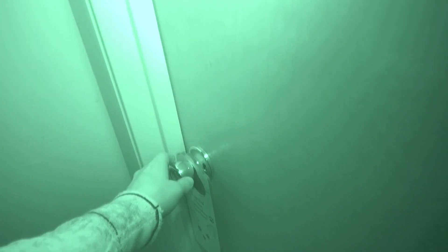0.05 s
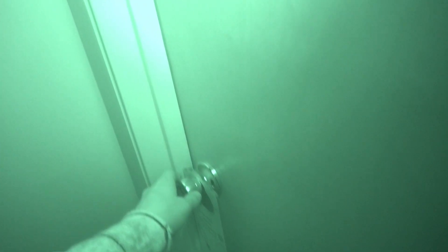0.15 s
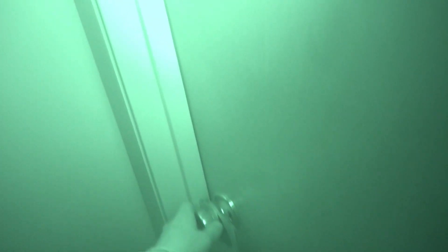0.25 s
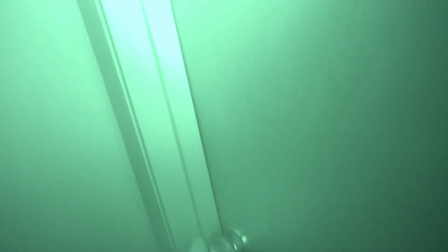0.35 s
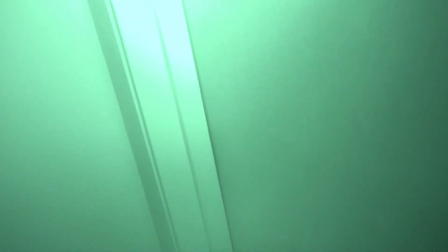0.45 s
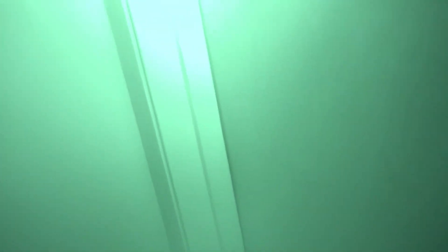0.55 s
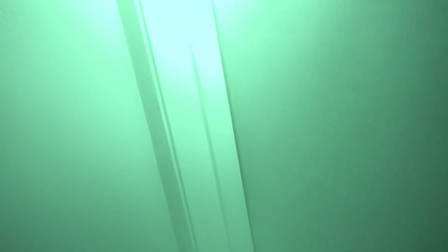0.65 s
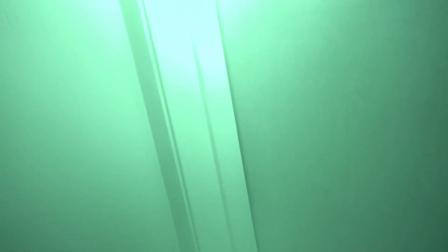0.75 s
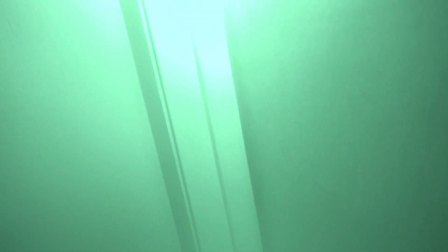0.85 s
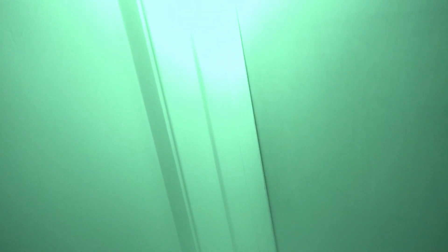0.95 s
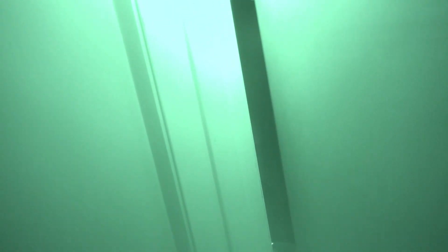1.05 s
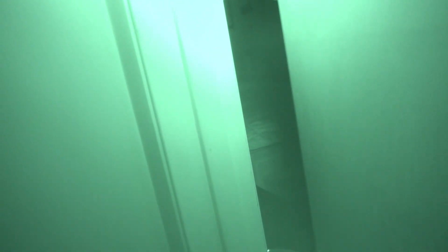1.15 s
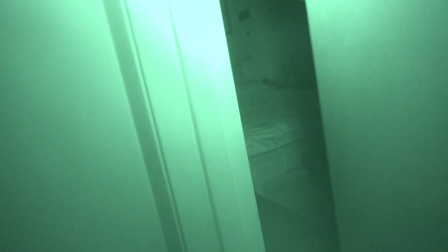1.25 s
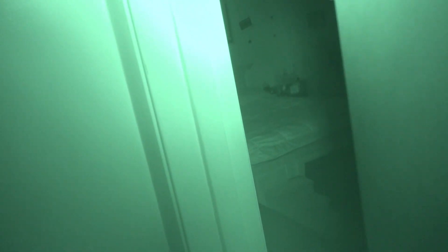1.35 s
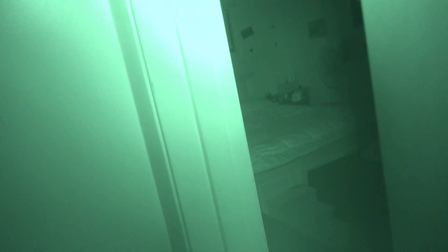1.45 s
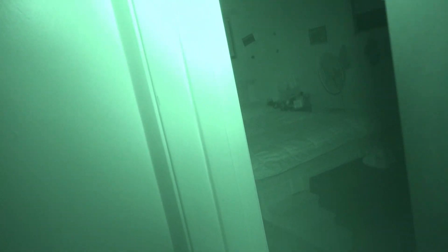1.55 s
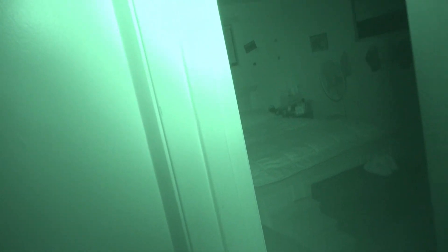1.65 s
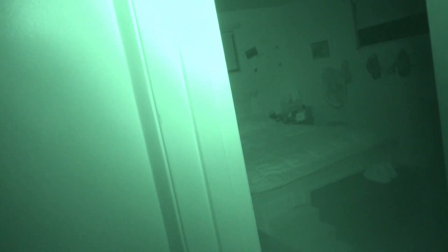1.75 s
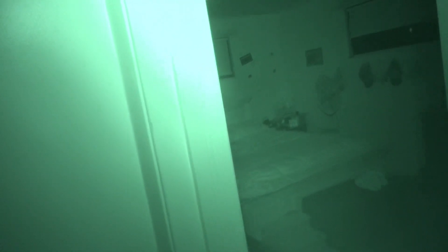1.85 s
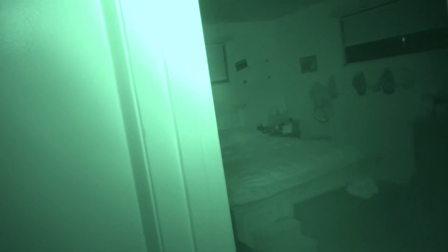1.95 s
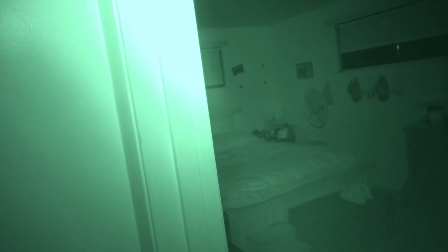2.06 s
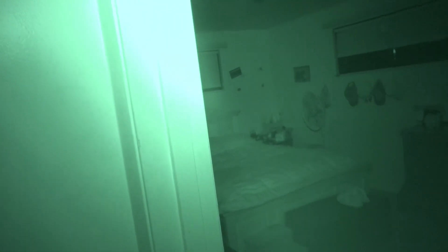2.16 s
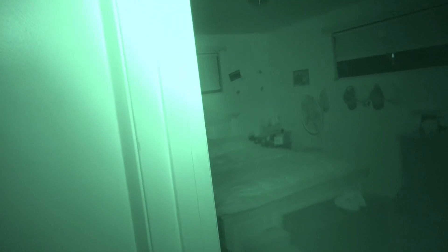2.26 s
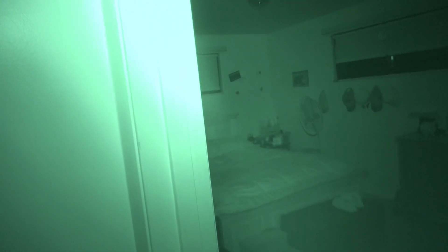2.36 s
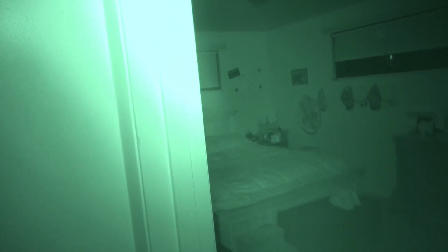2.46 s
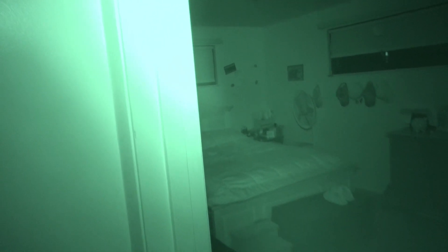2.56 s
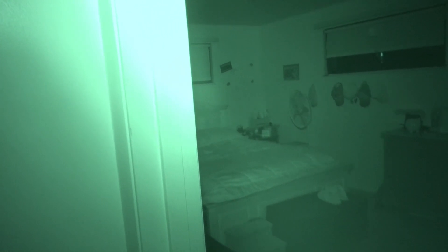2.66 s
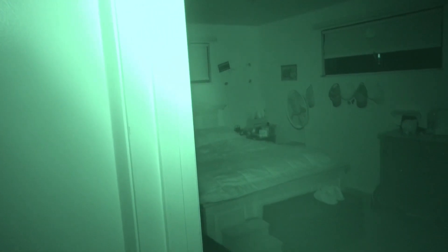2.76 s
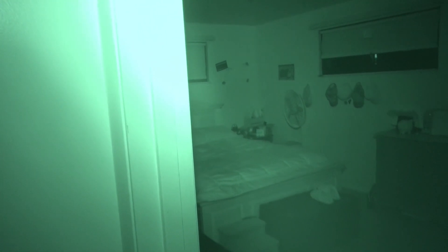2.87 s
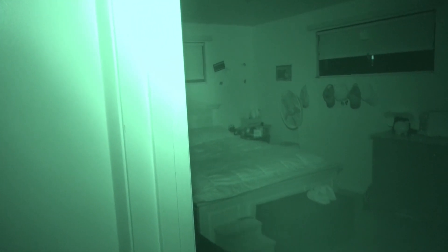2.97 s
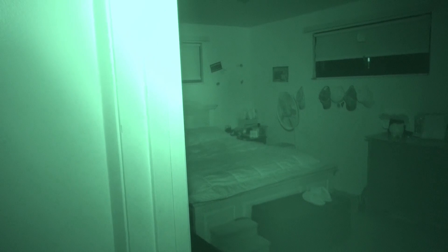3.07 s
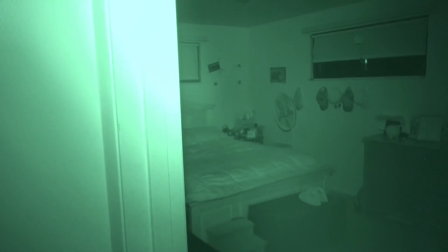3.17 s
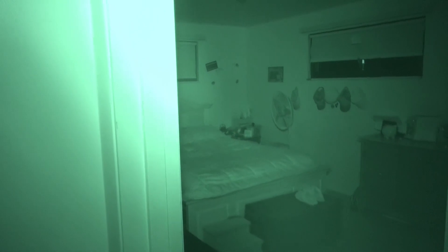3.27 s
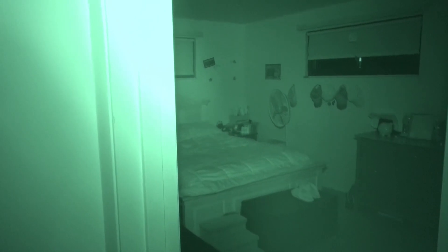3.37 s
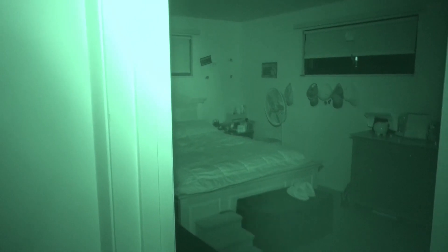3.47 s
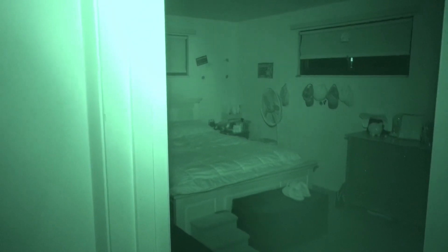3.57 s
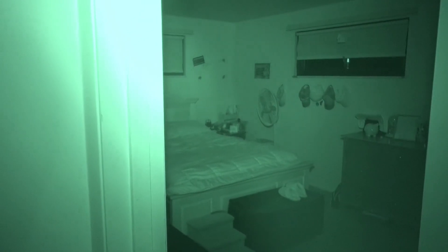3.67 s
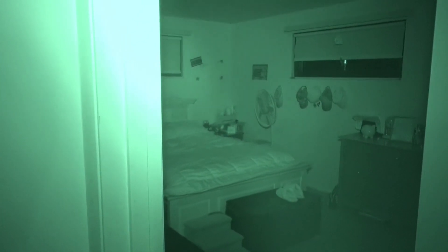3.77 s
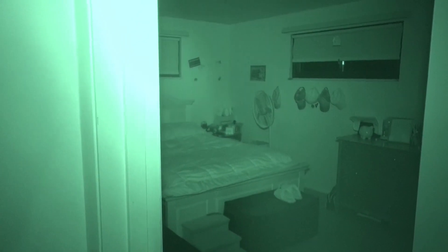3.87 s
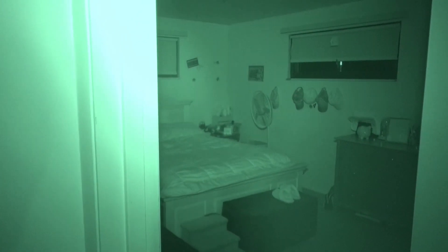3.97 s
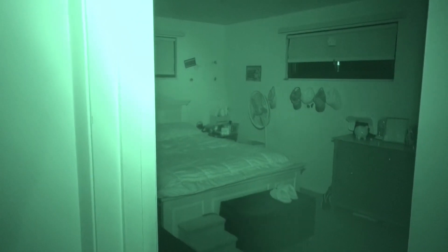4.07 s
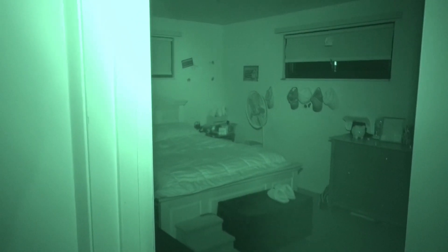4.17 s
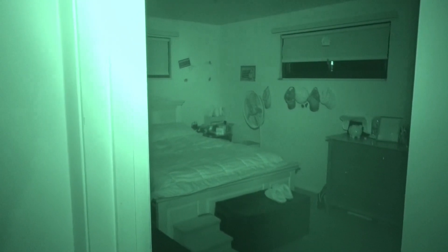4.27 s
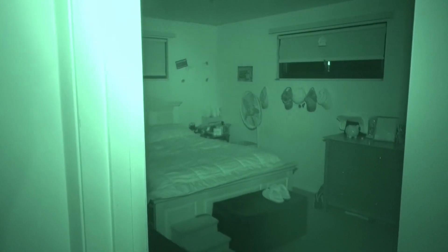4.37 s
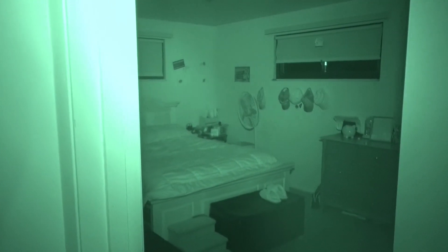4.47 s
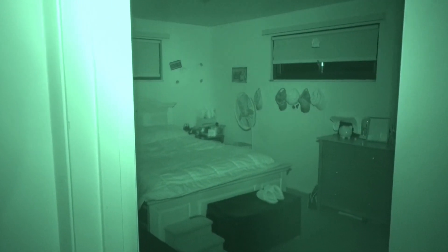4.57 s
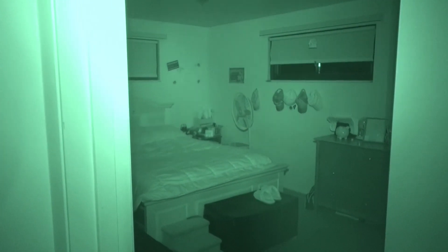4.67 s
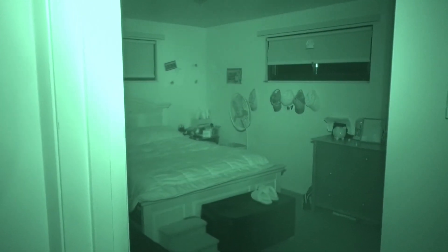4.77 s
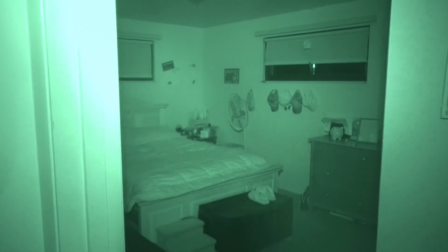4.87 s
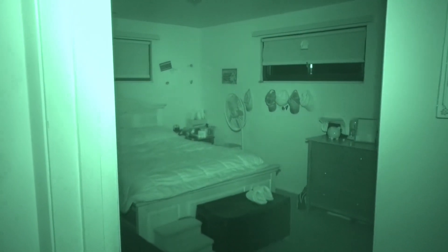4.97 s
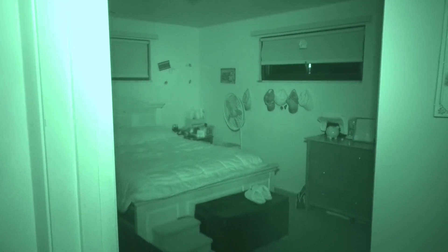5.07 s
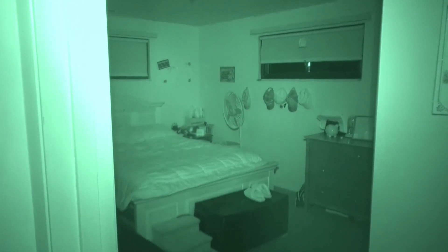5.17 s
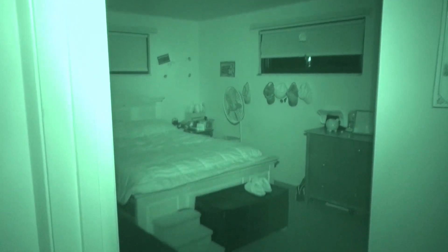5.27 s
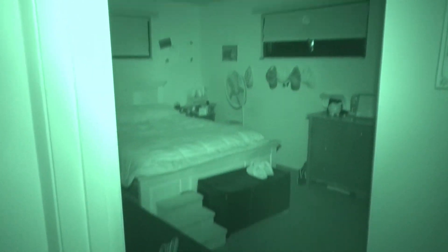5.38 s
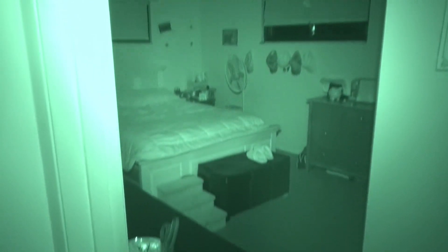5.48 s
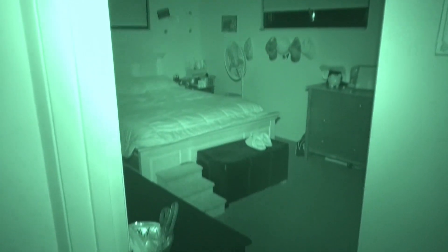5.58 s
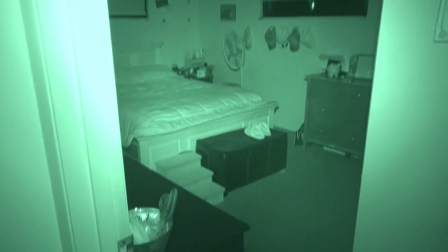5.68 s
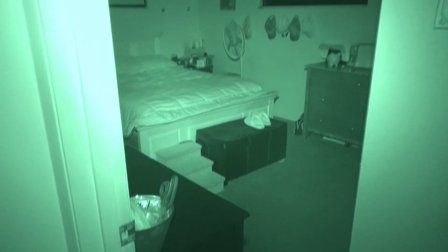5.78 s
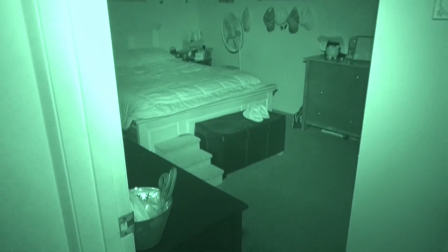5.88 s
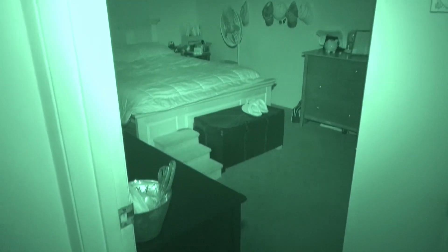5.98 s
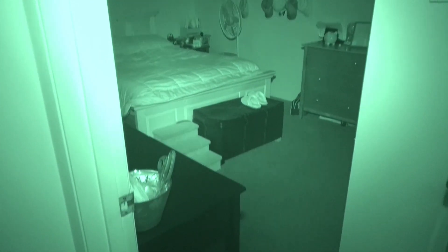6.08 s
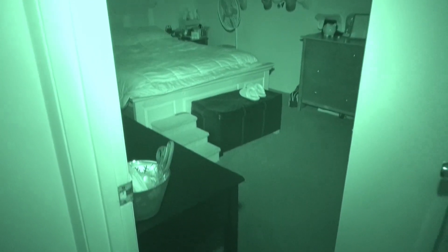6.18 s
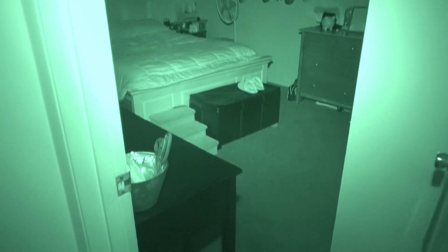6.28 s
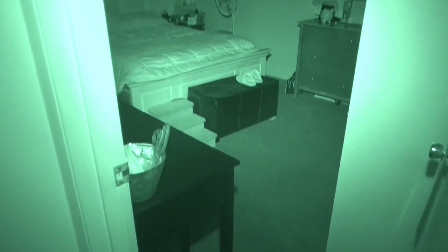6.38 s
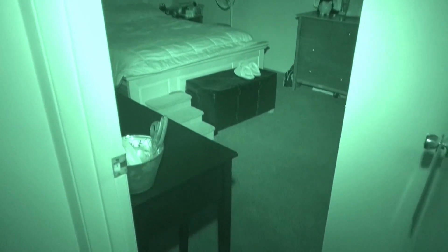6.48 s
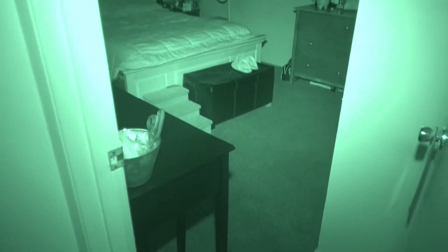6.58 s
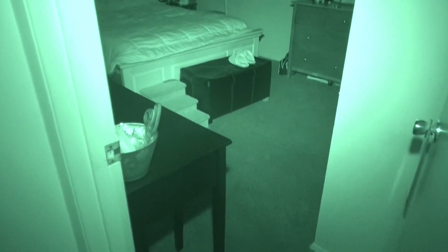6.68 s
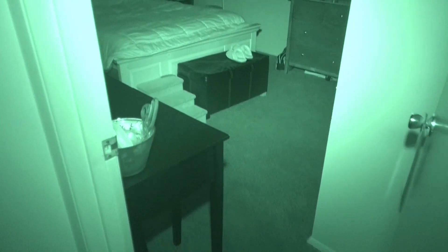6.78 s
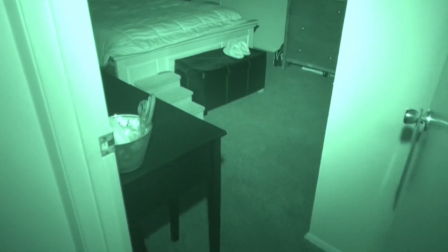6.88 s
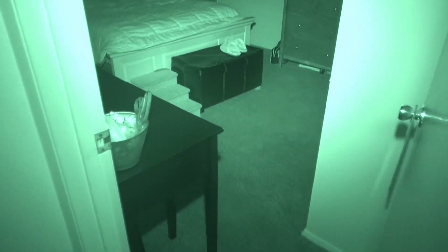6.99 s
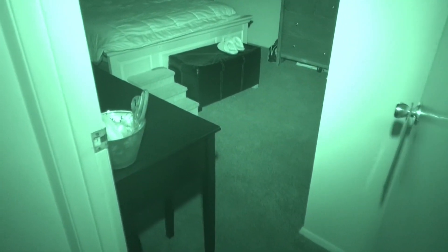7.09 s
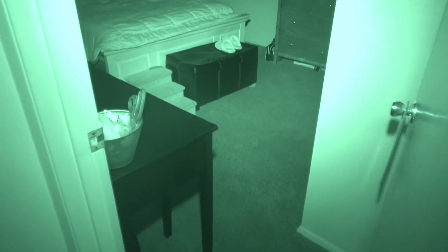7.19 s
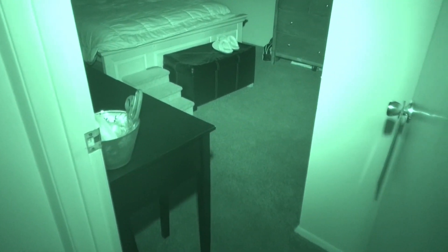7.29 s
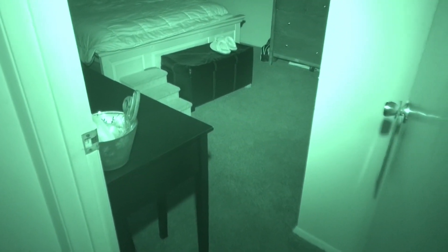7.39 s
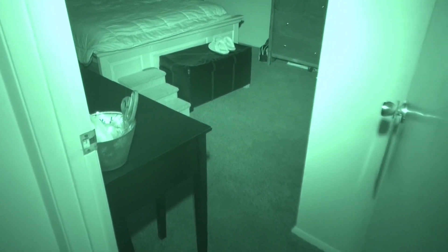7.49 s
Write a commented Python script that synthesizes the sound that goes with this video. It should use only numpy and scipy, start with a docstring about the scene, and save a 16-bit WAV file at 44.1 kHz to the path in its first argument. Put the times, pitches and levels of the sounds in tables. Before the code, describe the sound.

Quiet indoor room tone throughout: soft, slightly drifting hiss with a very faint fan hum near 350 Hz. From about 0.5 s a hand rubs the knob and a short spindle scrape sounds; at 0.7-0.95 s the hollow door bumps in its frame with dull wooden thumps and metal clacks. A scrape and faint groan come around 1.0 s, then loud bright latch clacks at 1.19 and 1.25 s, a rapid accelerating knob rattle with springy scrape near 1.3 s, and a sharp bolt snap with ringing at 1.5 s. A faint sleeve rustle follows near 1.95 s, then calm. Around 3.75-4.5 s the hinges rub, creak at 3.98 s, groan low and tick in a small cluster to 4.43 s, with soft cloth rustling. A dry plastic click at 5.46 s, a soft floorboard double knock at 5.67 s, then only hiss. Close stereo, door mostly right.

```python
"""A hand turns the knob of a hollow interior door in a quiet house at night, over room hiss and a faint fan hum.
The door shifts in its frame, the latch clacks, the knob rattles back on its spring and the bolt shoots out.
A sleeve rustles; the hinges creak and tick as the door swings wide; the camera clicks; a floorboard knocks.
Blows: cracks, noise clouds and decaying sines. Friction: filtered random slips and rough gliding tones."""
import sys
import numpy as np
from scipy import signal
from scipy.fft import rfft, irfft, next_fast_len
from scipy.io import wavfile
from scipy.ndimage import uniform_filter1d

SR = 44100
rng = np.random.default_rng(int(sys.argv[2]) if len(sys.argv) > 2 else 0)


def log_audio(samples):
    """Write samples as a 16-bit WAV file to the path given in sys.argv[1]."""
    # one column per channel
    frames = np.atleast_2d(samples).T
    # limit to full scale, then quantise
    limited = np.clip(frames, -1, 1)
    pcm = np.round(limited * 32767).astype(np.int16)
    wavfile.write(sys.argv[1], SR, pcm)


N = 332425
PADDED = next_fast_len(N, True)
TIME_S, FREQ_HZ = np.arange(N) / SR, np.fft.rfftfreq(PADDED, 1 / SR)

# knob and latch knocks: t/s, door level/dB, panel level/dB, case level/dB, bolt level/dB,
# first touch/ratio, rebound/ratio
KNOCKS = [ (0.549, -51, -53.5, -44.5, -61, 0.01, 0), (0.580, -44, -54, -48, -65, 0.52, 0.02),
          (0.708, -39.5, -40.5, -34, -35, 0.02, 0), (0.785, -22, -35, -25, -41.5, 0.4, 0),
          (0.836, -23, -34, -32, -47, 0, 0), (0.850, -26.5, -42.5, -34, -44.5, 0.01, 0.01),
          (0.953, -34.5, -45, -64, -75, 0, 0.01), (1.121, -50.5, -39.5, -29, -37, .25, 0),
          (1.134, -37.5, -35, -24.5, -45.5, 0.03, 0.3), (1.1895, -56, -25, -11.5, -10.5, 0.13, 0.28),
          (1.251, -33.5, -23, -24, -9, 0.3, 0), (1.5054, -26.5, -24, -13, -17.5, 0, .38)]
# a loose part touches just before it seats, then rebounds
TOUCH_LEAD_S, REBOUND_S = 0.005, 0.008
# rebounds favour the wood: door, panel, case, bolt gain/dB
REBOUND_COLOUR_DB = (6, 8.5, 2, -6)
# the released knob rattles on its spring, each gap shorter than the last
RATTLE_START_S, RATTLE_GAP_S, RATTLE_SHRINK = 1.276, 0.018, 0.7
# rattle: door, panel, case, bolt level/dB
RATTLE_DB = (-36.5, -33, -28.5, -29.5)
# modes of door, wooden skin, latch case, steel bolt: f/Hz, relative level/dB, t60/s
DOOR_MODES = [(59.6, 5.5, 0.45), (71, -6.5, 0.9), (118, -11, 0.93), (179.7, 0.5, 0.6), (242.4, -7, 0.52),
              (310, -11, 0.57)]
PANEL_MODES = [(192, -3, 0.86), (363.5, -5.5, .35), (405, -6.5, 0.42), (450, -4, 0.51), (513, -3, 0.35),
               (585.7, 3, 0.28), (768, -21, 0.18), (776, 7.5, 0.09), (963, 9.5, 0.099), (1180, -5.5, 0.16),
               (1313, -5.5, 0.12)]
CASE_MODES = [(1752, 0.5, 0.13), (1772, -4, .16), (1845, 0, 0.067), (1920, -26, .16), (2290, 1, .1),
              (2390, 0, .12), (3060, 1, .035), (3760, -20, .09)]
BOLT_MODES = [(4125, 4, 0.072), (4360, -23.5, .07), (4935, 3, 0.11), (4930, -23.5, 0.074), (5770, 8, 0.048),
              (5950, -7.5, 0.064), (7600, -24, 0.089), (8050, -16, 0.046), (9500, -26.5, 0.099)]
# dense, unresolved modes of the same parts: f/Hz, relative density/dB per Hz
DOOR_SPECTRUM = [(20, -33), (38, -19), (58, 5.5), (85, 0), (120, -7.5), (165, -3), (240, -12.5),
                 (400, -19.5), (1000, -73.5)]
PANEL_SPECTRUM = [(60, -17), (140, -5.5), (230, 8.5), (400, 2.5), (600, 4.5), (850, 3), (1200, -1.5),
                  (1800, -10), (3000, -25), (7000, -74)]
CASE_SPECTRUM = [(300, -21.5), (800, -5.5), (1250, -2), (1900, 4.5), (2700, -2), (3500, 0), (4500, -6.5),
                 (6500, -16.5), (12000, -69)]
BOLT_SPECTRUM = [(800, -45.5), (2200, -4.5), (3600, 3), (5000, -0.5), (6500, 0), (8000, -3.5), (9500, -14),
                 (12500, -22), (15500, -58.5)]
# hollow knob meets the ends of its play: t/s, level/dB
KNOB_STOPS = [(0.71, -36), (0.782, -30), (1.135, -36), (1.189, -25)]
# knob modes: f/Hz, relative level/dB, t60/s
KNOB_MODES = [(1014, -6.5, 0.097), (1176, 4.5, 0.13), (1280, -9.5, 0.22)]
# freed bolt slams against its face plate: t/s, level/dB
BOLT_SLAM = [(1.510, -20)]
# door edge modes under the slam: f/Hz, relative level/dB, t60/s
EDGE_MODES = [(296, -14, 0.616), (400, -21, 0.24), (456, -13, 0.49), (727, 0, 0.32), (796, 4.5, 0.23),
              (1330, -14, .17), (1813, -9.5, 0.29), (1858.5, -9, .19)]

# door edge bumps its soft stop: t/s, level/dB
BUMPS = [(0.616, -45.5), (0.784, -24), (0.836, -19.5), (0.858, -27.5), (0.904, -36), (1.253, -33.5),
         (1.303, -37.5)]
# hollow frame: f/Hz, relative density/dB per Hz
FRAME_SPECTRUM = [(50, -21), (95, 1.5), (135, 4.5), (180, -4), (230, 2), (300, -9), (520, -6), (900, -50.5),
                  (4000, -83)]
# floorboard gives under the shifting weight: t/s, level/dB
BOARD_KNOCKS = [(5.663, -38), (5.674, -44)]
# floorboard: f/Hz, relative density/dB per Hz
BOARD_SPECTRUM = [(80, -23), (170, -19), (270, 8), (450, -4), (650, 0), (1150, 2), (2200, -1.5),
                  (3200, -15), (4200, -13), (7000, -36)]

# sliding strokes of hand, spindle, spring, bolt, sleeve: peak t/s, level/dB, swell/s, fade/s
GRIP = [(.455, -51.5, .03, 0.19), (.62, -43.5, 0.28, 0.78), (1.02, -38.5, .11, .3), (1.44, -51, .15, .05)]
SPINDLE = [(.618, -34, 0.0033, 0.037), (1.003, -30, 0.041, 0.087)]
SPRING = [(1.305, -28.5, .032, 0.04)]
SLIDE = [(1.0, -50.5, .1, .14), (1.15, -54, .1, 0.26), (1.305, -31.5, .024, .03)]
SLEEVE = [(1.95, -52, 0.11, 0.25), (4.22, -48.5, 0.65, 0.72), (4.9, -56, 0.52, 1.05)]
# sliding resonances: f/Hz, width/Hz, relative level/dB
SPINDLE_PEAKS = [(835, 60, -4.5), (850, 19, -6), (926, 57, 3), (1042, 53, -3), (1170, 35, -11.5)]
SPRING_PEAKS = [(4250, 90, 7), (4410, 90, -6.5), (5950, 70, 7.5), (6980, 110, -16), (7140, 150, -12.5),
                (8450, 120, -3), (8900, 500, -14.5)]
# bolt on its plate, sleeve cloth: f/Hz, relative level/dB
STEEL_HISS = [(1000, -33.5), (2500, 8.5), (4500, 0), (6000, 5), (8500, 1.5), (9800, -16.5), (15000, -22)]
CLOTH = [(80, -22), (200, 10.5), (500, 2.5), (1000, -0.5), (2000, -2), (4000, -8), (7000, -10.5),
         (10000, -27), (15000, -43)]

# hinge ticks: t/s, wood level/dB, pin level/dB, steel leaf level/dB
HINGE_TICKS = [(3.967, -57, -45.5, -80), (4.231, -39.5, -47, -61), (4.246, -41.5, -60, -75),
               (4.260, -43, -37.5, -58), (4.314, -64, -51, -53), (4.353, -48, -39, -45.5),
               (4.398, -42, -36.5, -59), (4.4256, -44, -31, -60), (4.43, -42, -43, -54)]
# jamb and hinge pin: f/Hz, relative density/dB per Hz
JAMB_SPECTRUM = [(60, -23), (120, -5.5), (210, 0), (450, 0.5), (700, 1), (1100, -12), (1800, -29),
                 (3500, -25), (8000, -53)]
PIN_SPECTRUM = [(300, -42), (700, -31), (950, 0.5), (1700, 5), (2400, -1), (3500, 0.5), (4600, -10),
                (7000, -18), (10000, -46), (15000, -43)]
# hinge leaf modes: f/Hz, relative level/dB, t60/s
LEAF_MODES = [(700, -2, 0.17), (1756, -3, .12), (3200, -4, 0.14), (3450, 3, 0.052), (4200, -3, 0.071),
              (5040, 3.5, 0.05), (5300, -8, 0.064)]
# hinge rub strokes: peak t/s, level/dB, swell/s, fade/s
HINGE = [(3.75, -58.5, .15, 0.22), (3.978, -37, 0.022, .03), (4.15, -51, 0.21, 0.27),
         (4.27, -47.5, 0.17, 0.44), (4.406, -34.5, 0.033, 0.032), (4.86, -57.5, 0.12, 0.25)]
# hinge rub resonances: f/Hz, width/Hz, relative level/dB
HINGE_PEAKS = [(294, 73, -15.5), (474, 25, -1.5), (763, 62, -10.5), (928, 40, -12), (1290, 160, -22.5)]
# squeaks and groans of the spindle, the bolt on its plate, then the hinge as it catches and takes the weight:
# peak t/s, level/dB, swell/s, fade/s, f/Hz, glide/octaves per s, roughness/0-1
GROANS = [(.619, -35, 0.0046, .025, 926, -2, .6), (1.04, -42, .1, 0.14, 630, 2.5, .5),
          (3.982, -43, .028, 0.022, 489.4, 0, 0.51), (4.268, -39, .06, .1, 228, -2, 0.5),
          (4.28, -46.5, .07, 0.11, 342, 0, .7), (4.325, -43, .04, 0.031, 246, 10, 0.5)]

# camera shell click: t/s, level/dB
CLICKS = [(5.4583, -31)]
# camera shell: f/Hz, relative density/dB per Hz
SHELL_SPECTRUM = [(30, -15), (60, 11), (130, -18), (280, -5), (550, 6.5), (1000, -0.5), (2000, -5.5),
                  (4000, -5.5), (6700, -2), (9000, -10), (13000, -23), (16000, -34)]

# door at the microphones, left over right: f/Hz, level/dB
SHADE = [(60, -18), (300, -20), (700, -14), (1200, -10), (2500, -9), (6000, -6.5), (12000, -3)]
# door, likeness of left to right: f/Hz, likeness/0-1
ALIKE = [(60, 0.43), (300, 0.97), (900, 0.72), (2200, 0.414), (6000, 0.68), (12000, 0.71)]
# door, phase by which left leads: f/Hz, phase/rad
LEAD = [(60, -0.43), (280, 0.38), (900, 0.85), (2300, -1.4), (6000, -1.34), (12000, -1.1)]

# room hiss: f/Hz, relative density/dB per Hz
HISS_SPECTRUM = [(15, -24), (25, -28.5), (49, -4.5), (69, -1.5), (86, -9.5), (109, -10), (237, -5.5),
                 (271, -8), (354, -4), (438, -5.5), (501, -5), (1150, -3), (1460, -6), (2700, -9),
                 (15000, -29.5)]
HISS_BASE_DB = -57.83  # before the drift
# hiss, left over right: f/Hz, level/dB
HISS_SIDE = [(60, -18.5), (110, -6), (200, -4.5), (380, 1), (700, 7.5), (1290, 7), (2380, 7), (4400, 5.5),
             (8120, 3), (15000, -12)]
# hiss, likeness of left to right: f/Hz, likeness/0-1
HISS_ALIKE = [(60, 0.66), (250, 0.19), (900, 0.52), (2500, 0.52), (6000, 0.64), (12000, 0.032)]
# hiss drift: t/s, gain/dB
DRIFT = [(0, 1), (1.7, 3.5), (2.3, 2.5), (3.5, 0.5), (5.2, 1.5), (6.2, 0), (7.5, -1)]
FAN_HZ = 349
# fan hum in the left channel: t/s, peak level/dB
FAN = [(0, -69.5), (1.8, -75), (2.9, -73), (4, -71.5), (5.7, -72.5), (7.5, -84.5)]
BAND_EDGE_HZ = 14700


def knocks():
    """Every contact shakes door, skin, latch case and bolt; the knob and the door edge ring too."""
    t_s, door, panel, case, bolt = np.transpose(blows())
    dense = struck(t_s, door, DOOR_SPECTRUM, 6.2, body_t60_s=0.1, room_db=-3.5, room_t60_s=0.53, rise_s=0.0046)
    dense += struck(t_s, panel, PANEL_SPECTRUM, 7.9, body_t60_s=0.29, room_db=-2, room_t60_s=0.34, rise_s=0.003)
    dense += struck(t_s, case, CASE_SPECTRUM, 4.8, body_t60_s=0.05, room_db=-15, room_t60_s=0.26, rise_s=0.00054)
    dense += struck(t_s, bolt, BOLT_SPECTRUM, 5, body_t60_s=0.053, room_db=-21.5, room_t60_s=0.27, rise_s=0.00029)
    clear = ringing(t_s, door - 2, DOOR_MODES, rise_s=0.0038)
    clear += ringing(t_s, panel - 5.5, PANEL_MODES, rise_s=0.0028)
    clear += ringing(t_s, case - 12, CASE_MODES, rise_s=0.00039)
    clear += ringing(t_s, bolt - 15, BOLT_MODES, rise_s=0.00018)
    knob = ringing(*np.transpose(KNOB_STOPS), KNOB_MODES, rise_s=0.002)
    edge = ringing(*np.transpose(BOLT_SLAM), EDGE_MODES, rise_s=0.0061)
    return dense + clear + knob + edge


def blows(rebound_count=2, rattle_count=4):
    """Contacts (t/s, four part levels/dB): knocks with first touches and weakening rebounds, then the rattle."""
    rows = []
    for t_s, *parts_db, touch, rebound in KNOCKS:
        parts_db = np.array(parts_db)
        rows.append((t_s, *parts_db))
        if touch > 0:
            touch_db = parts_db + 20 * np.log10(touch)
            rows.append((t_s - TOUCH_LEAD_S, *touch_db))
        if rebound > 0:
            for k in range(1, rebound_count + 1):
                rebound_db = parts_db + REBOUND_COLOUR_DB + 20 * k * np.log10(rebound)
                rows.append((t_s + k * REBOUND_S, *rebound_db))
    gaps_s = RATTLE_GAP_S * RATTLE_SHRINK ** np.arange(rattle_count)
    rattle_s = RATTLE_START_S + np.cumsum(gaps_s) - gaps_s
    return rows + [(t_s, *RATTLE_DB) for t_s in rattle_s]


def struck(times_s, levels_db, spectrum, crack, body_t60_s, room_db, room_t60_s, rise_s):
    """Each blow gives a crack, a decaying noise cloud of dense modes and a room tail."""
    t = np.arange(SR // 2) / SR
    body = amp(-60 * t / body_t60_s)
    room = amp(room_db - 60 * t / room_t60_s)
    cloud = np.hypot(body, room) * (1 - np.exp(-t / rise_s))
    cloud *= np.minimum(1, 10 * (t[-1] - t))  # the tail fades out
    out = np.zeros((2, N))
    for t_s, db in zip(times_s, levels_db):
        blow = cloud * rng.standard_normal((2, len(t)))
        blow[0, 0] += crack
        add(out, t_s, amp(db) * blow)
    return colour(out, spectrum)


def ringing(times_s, levels_db, modes, rise_s):
    """Each blow rings the clear modes as decaying sines; the room scatters each mode by chance."""
    t = np.arange(SR) / SR
    rings = np.array([amp(db - 60 * t / t60_s) * np.sin(2 * np.pi * hz * t) for hz, db, t60_s in modes])
    rings *= 1 - np.exp(-t / rise_s)
    out = np.zeros((2, N))
    for t_s, db in zip(times_s, levels_db):
        spot, scatter = rng.standard_normal((2, len(modes)))
        shares = np.array([1 + 0.3 * spot, scatter])  # no two blows land on the same spot
        add(out, t_s, amp(db) * (shares @ rings))
    return out


def woodwork():
    """Dull, low bumps of the door on its frame, and knocks of a floorboard, each a damped noise cloud."""
    frame = struck(*np.transpose(BUMPS), FRAME_SPECTRUM, crack=3,
                   body_t60_s=0.11, room_db=-12, room_t60_s=0.73, rise_s=0.003)
    board = struck(*np.transpose(BOARD_KNOCKS), BOARD_SPECTRUM, crack=2.9,
                   body_t60_s=0.082, room_db=-9, room_t60_s=0.29, rise_s=0.002)
    return frame + board


def friction():
    """The hand rubs the door into a low murmur; spindle, spring and bolt scrape; a sleeve rustles."""
    # f/Hz, relative level/dB
    murmur = [(25, -43), (60, -7.5), (110, -6), (190, -3.5), (350, 1), (550, -12), (1200, -14.0), (8000, -47)]
    hand = colour(slips(980) * strokes(GRIP), murmur)
    knob = rubbed(SPINDLE, SPINDLE_PEAKS, 1200) + rubbed(SPRING, SPRING_PEAKS, 2500)
    bolt = colour(slips(6000) * strokes(SLIDE), STEEL_HISS)
    sleeve = colour(slips(3000) * strokes(SLEEVE), CLOTH)
    return hand + knob + bolt + sleeve


def hinges():
    """The pins rub and slip in ticks that ring the leaves and knock on the jamb."""
    t_s, wood, pin, leaf = np.transpose(HINGE_TICKS)
    ticks = struck(t_s, wood, JAMB_SPECTRUM, 2.9, body_t60_s=0.27, room_db=-5.5, room_t60_s=0.32, rise_s=0.00063)
    ticks += struck(t_s, pin, PIN_SPECTRUM, 4.4, body_t60_s=0.073, room_db=-7.5, room_t60_s=0.19, rise_s=0.0006)
    ticks += ringing(t_s, leaf, LEAF_MODES, rise_s=0.00088)
    return ticks + rubbed(HINGE, HINGE_PEAKS, 900)


def groan(peak_s, db, swell_s, fade_s, hz, glide, rough):
    """Stick-slip locks into a rough tone whose pitch glides at a steady rate in octaves."""
    tone = strokes([(peak_s, db, swell_s, fade_s)])
    on = tone > 0
    jitter, shimmer = evened(uniform_filter1d(rng.standard_normal((2, N)), size=250))[:, on]
    pitch_hz = hz * 2 ** (glide * (TIME_S[on] - peak_s)) * (1 + 0.18 * rough * jitter)
    turns = np.cumsum(pitch_hz) / SR
    tone[on] *= np.sqrt(2) * np.sin(2 * np.pi * turns) * (1 + rough * shimmer)
    return tone


def rubbed(rows, peaks, per_s):
    """Slips under a sliding contact excite its resonances; neighbouring modes move in opposite senses."""
    t = np.arange(SR // 4) / SR
    ring = np.zeros(len(t))
    for k, (hz, width_hz, db) in enumerate(peaks):
        decay = width_hz * np.exp(-np.pi * width_hz * t)
        ring += (-1) ** k * amp(db) * decay * np.sin(2 * np.pi * hz * t)
    ring /= np.linalg.norm(ring)
    return signal.oaconvolve(slips(per_s) * strokes(rows), ring[None], axes=1)[:, :N]


def slips(per_s):
    """Tiny stick-slip jolts of uneven size at random moments, rms 1."""
    jolts = rng.random(N) < per_s / SR
    return evened(rng.standard_normal((2, N)) * jolts)


def strokes(rows):
    """Gain of strokes that swell to a peak and fade; swell and fade are the times taken for 20 dB."""
    gain = np.zeros(N)
    for peak_s, db, swell_s, fade_s in rows:
        away = np.maximum((peak_s - TIME_S) / swell_s, (TIME_S - peak_s) / fade_s)
        near = away < 4  # silent beyond -80 dB
        gain[near] = np.hypot(gain[near], amp(db - 20 * away[near]))
    return gain


def camera():
    """The plastic shell clicks dryly, right beside both microphones: a crack and a short noise cloud."""
    click = struck(*np.transpose(CLICKS), SHELL_SPECTRUM, crack=7.1,
                   body_t60_s=0.039, room_db=-19, room_t60_s=0.33, rise_s=0.00033)
    return microphones(click, side_db=-6.0, alike=[(500, 0.35), (6000, 1.0)], lead_rad=-1.8)


def room_tone():
    """Drifting air and microphone hiss as shaped noise, with the faint, wavering sine hum of a fan."""
    shape = evened(amp(read(HISS_SPECTRUM, FREQ_HZ)))
    side_db = read(HISS_SIDE, FREQ_HZ)
    balance = 2 / (1 + amp(side_db))  # holds the sum of left and right gains
    air = irfft(rfft(rng.standard_normal((2, PADDED))) * shape * balance, PADDED)
    drift_db = np.interp(TIME_S, *np.transpose(DRIFT))
    air = microphones(air, side_db, HISS_ALIKE, 0) * amp(HISS_BASE_DB + drift_db)
    waver_hz = 2.6 * evened(uniform_filter1d(rng.standard_normal(N), size=4000))
    hum = np.sin(2 * np.pi * np.cumsum(FAN_HZ + waver_hz) / SR) * level(FAN)
    return air + hum * amp([[0], [3]])  # right 3 dB louder


def microphones(x, side_db, alike, lead_rad):
    """Row 0 reaches the right microphone; the left hears part of it mixed with the scattered row 1."""
    near, scattered = rfft(x, PADDED)
    same = np.clip(read(alike, FREQ_HZ), 0, 1)
    left = same * near + np.sqrt(1 - same ** 2) * scattered
    left = left * amp(side_db) * np.exp(1j * lead_rad)
    return np.array([irfft(left, PADDED)[:N], x[0, :N]])


def amp(db):
    """Decibels to gain."""
    return 10 ** (np.asarray(db) / 20)


def evened(x):
    """Scales to rms 1."""
    return x / np.sqrt(np.mean(x ** 2) + 1e-20)


def read(points, hz):
    """Reads a table on a log-frequency axis."""
    f, value = np.transpose(points)
    return np.interp(np.log(hz + 1), np.log(f + 1), value)


def level(curve):
    """Gain over time from rows t/s, level/dB; -140 dB outside them."""
    return amp(np.interp(TIME_S, *np.transpose(curve), left=-140, right=-140))


def add(mix, t_s, sound):
    """Mixes a sound in at t_s, cut at the end of the mix."""
    part = mix[:, round(t_s * SR):][:, :sound.shape[1]]
    part += sound[:, :part.shape[1]]


def colour(x, spectrum, size=4096):
    """Causal minimum-phase filter of unit energy with the given spectrum."""
    log_gain = np.log(amp(read(spectrum, abs(np.fft.fftfreq(size, 1 / SR)))))
    taps = np.fft.ifft(np.exp(np.conj(signal.hilbert(log_gain)))).real
    return signal.oaconvolve(x, taps[None] / np.linalg.norm(taps), axes=1)[:, :N]


def scene():
    """The door, to the right of the camera, with the camera's click and the room tone."""
    door = knocks() + woodwork() + friction() + hinges() + sum(groan(*row) for row in GROANS)
    door = microphones(door, read(SHADE, FREQ_HZ), ALIKE, read(LEAD, FREQ_HZ))
    return door + camera() + room_tone()


def record(dry):
    """The input rounds off the highest peaks; a linear-phase low-pass then limits the band."""
    taps = signal.firwin(401, BAND_EDGE_HZ, window=("kaiser", 8), fs=SR)
    rounded = dry / (1 + dry ** 4) ** 0.25
    return signal.oaconvolve(rounded, taps[None], "same", axes=1)


dry = scene()
out = record(dry)
log_audio(out)
```